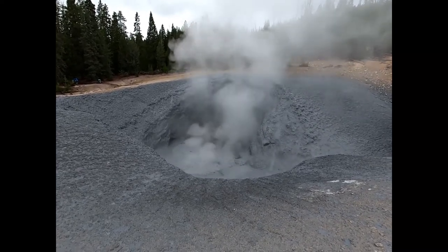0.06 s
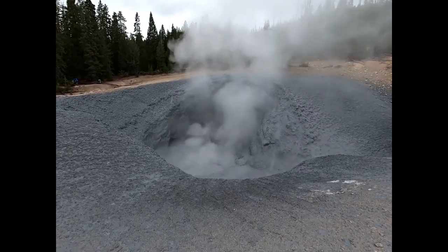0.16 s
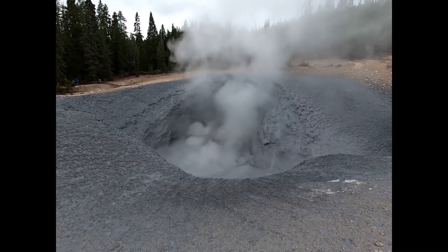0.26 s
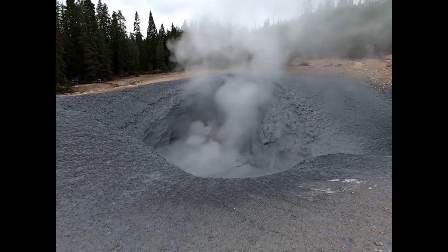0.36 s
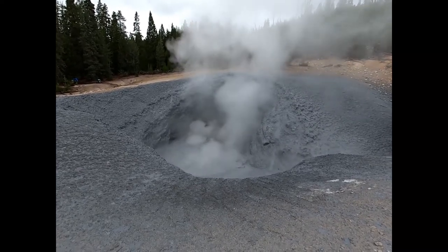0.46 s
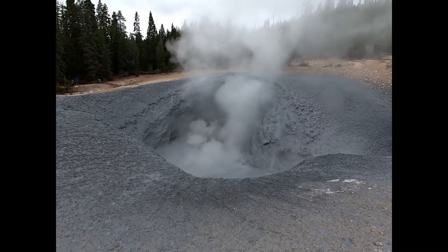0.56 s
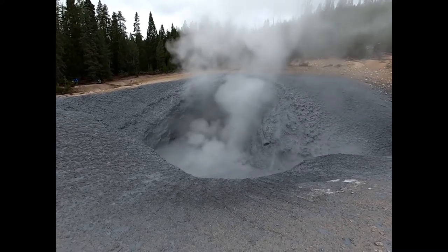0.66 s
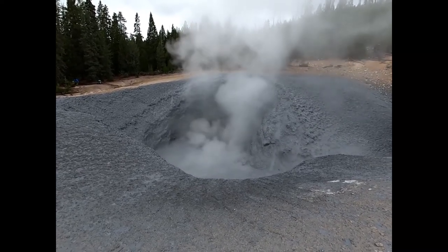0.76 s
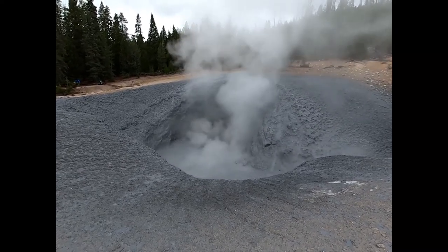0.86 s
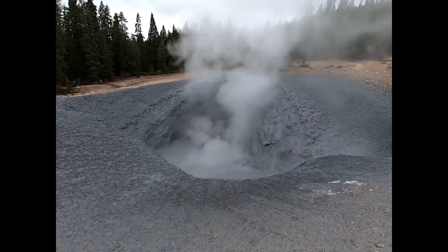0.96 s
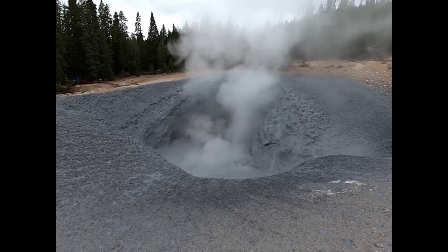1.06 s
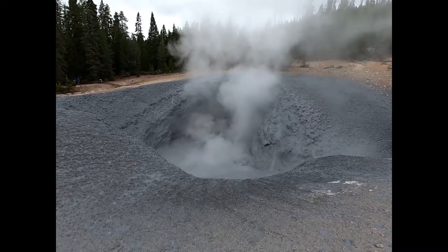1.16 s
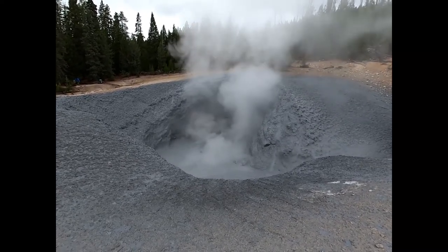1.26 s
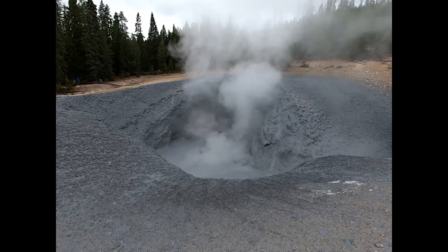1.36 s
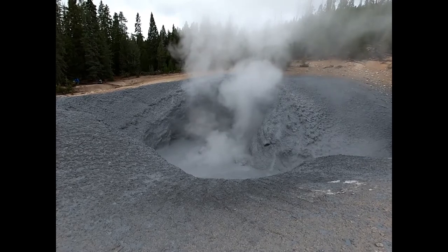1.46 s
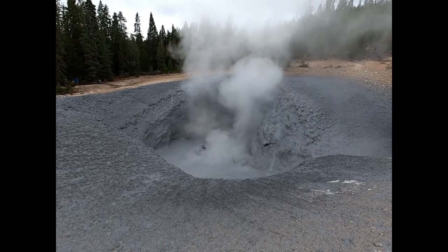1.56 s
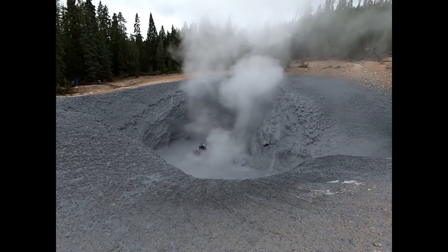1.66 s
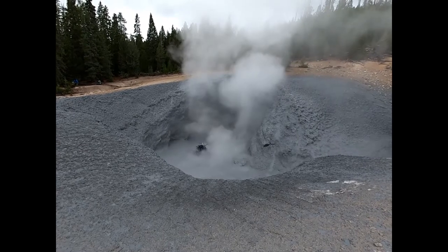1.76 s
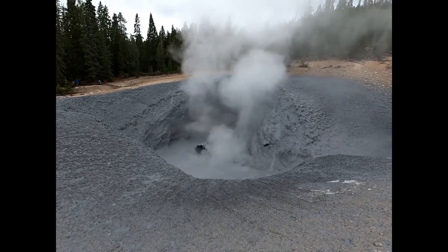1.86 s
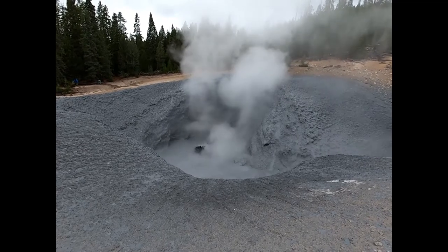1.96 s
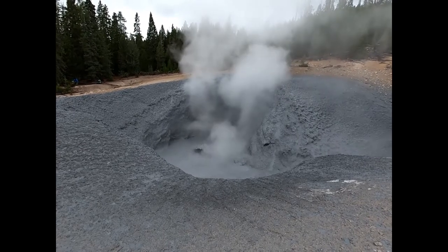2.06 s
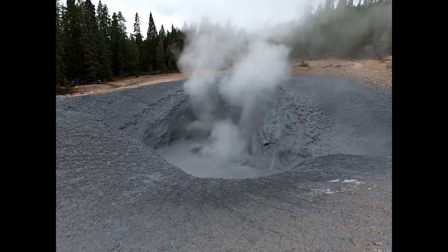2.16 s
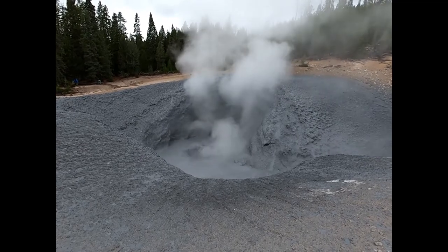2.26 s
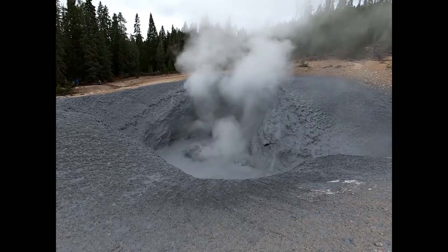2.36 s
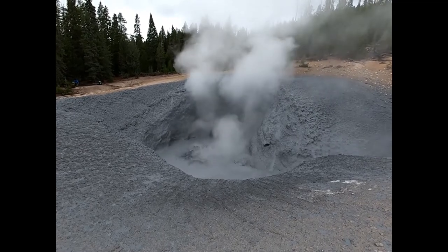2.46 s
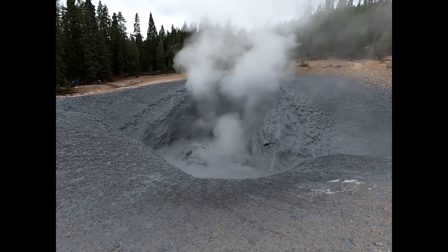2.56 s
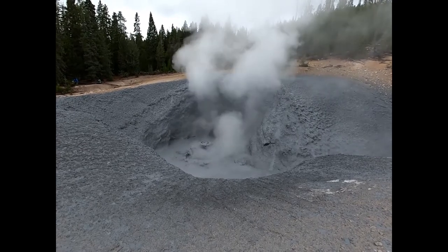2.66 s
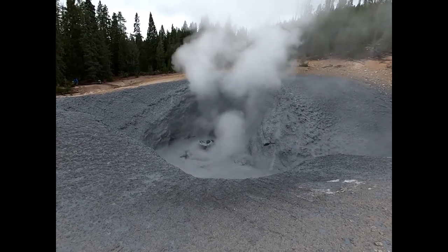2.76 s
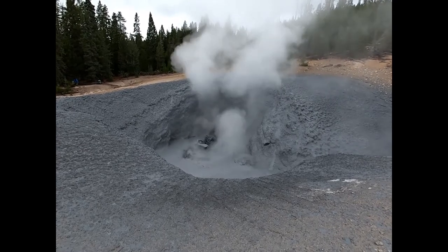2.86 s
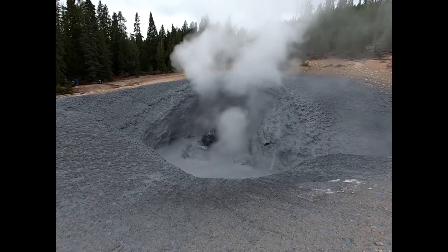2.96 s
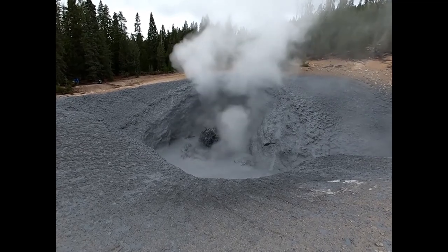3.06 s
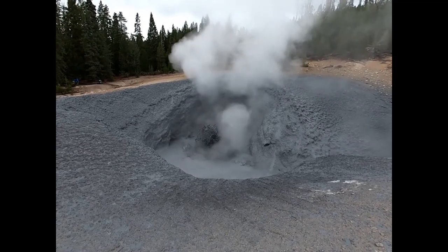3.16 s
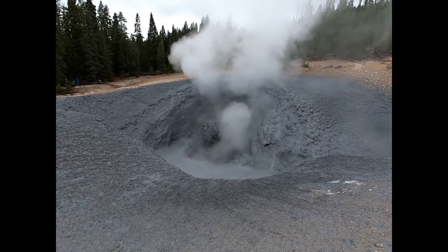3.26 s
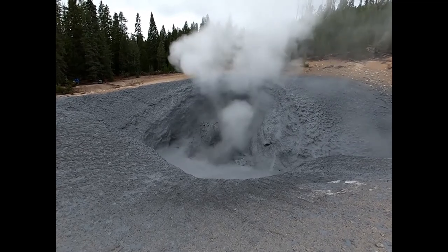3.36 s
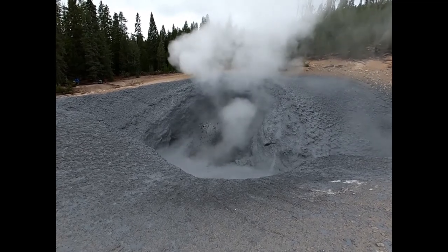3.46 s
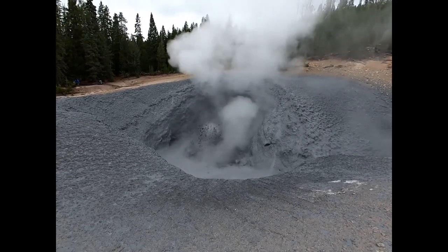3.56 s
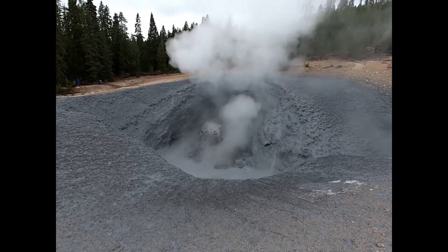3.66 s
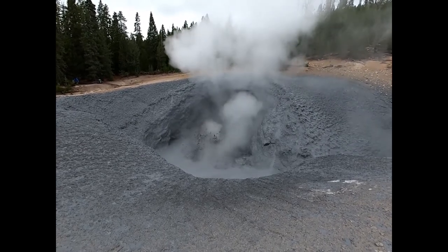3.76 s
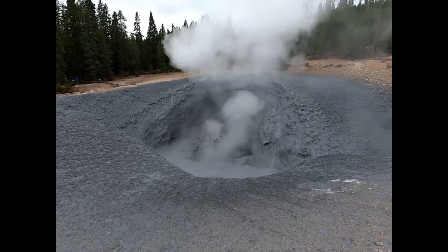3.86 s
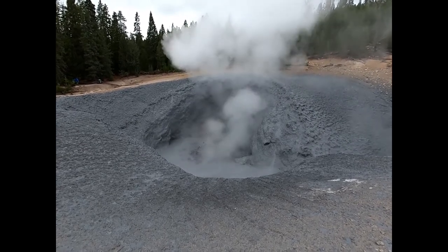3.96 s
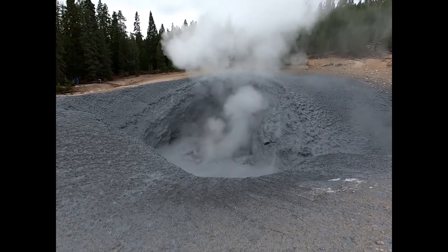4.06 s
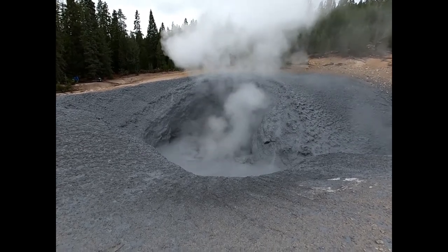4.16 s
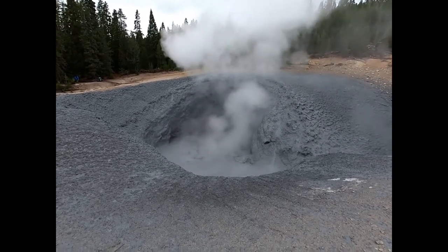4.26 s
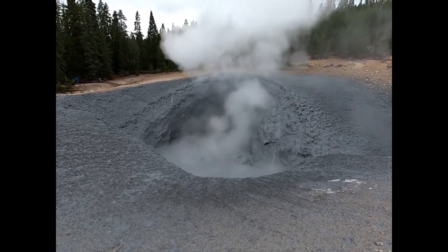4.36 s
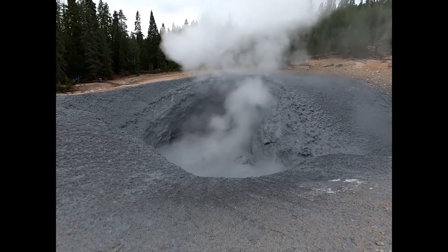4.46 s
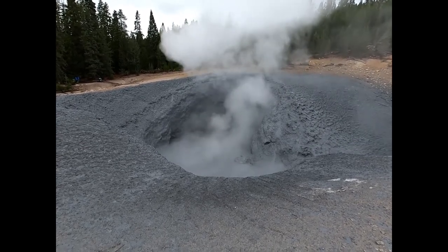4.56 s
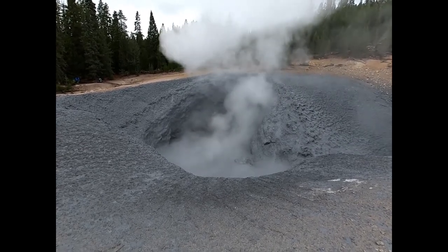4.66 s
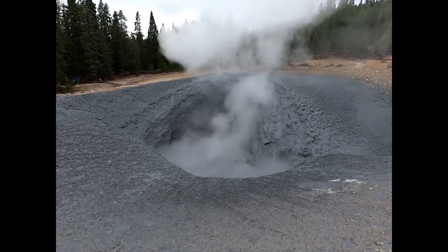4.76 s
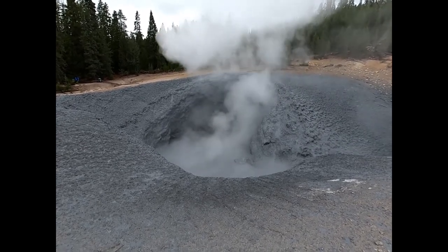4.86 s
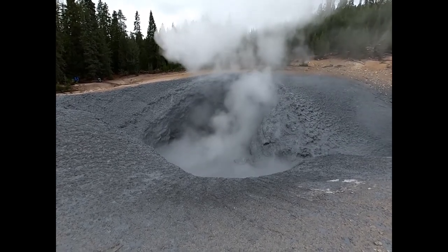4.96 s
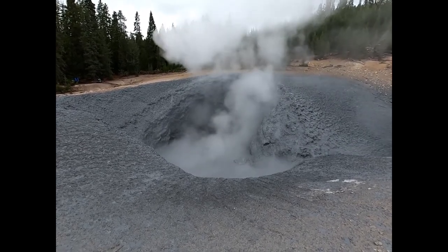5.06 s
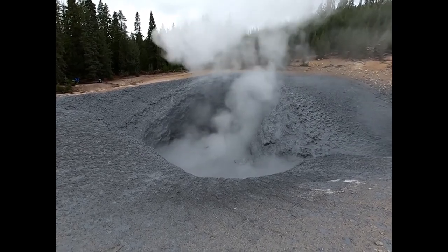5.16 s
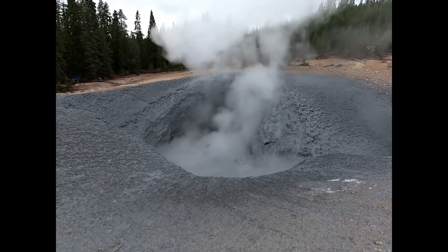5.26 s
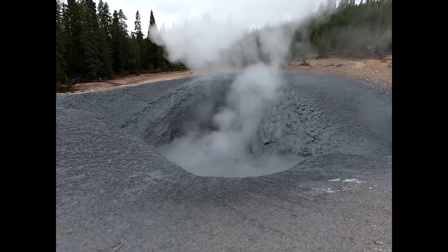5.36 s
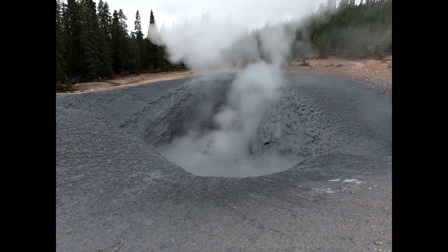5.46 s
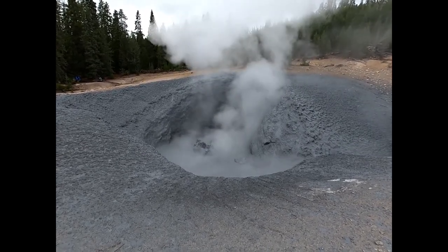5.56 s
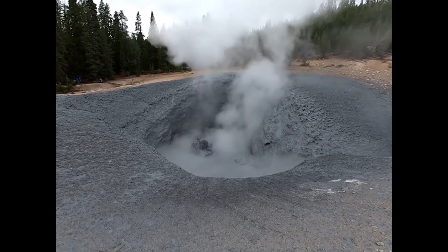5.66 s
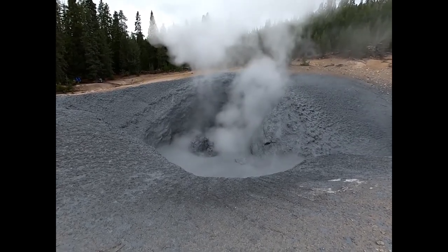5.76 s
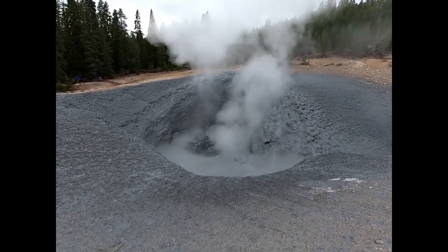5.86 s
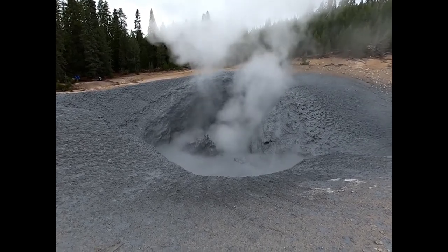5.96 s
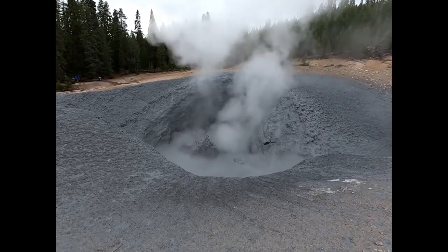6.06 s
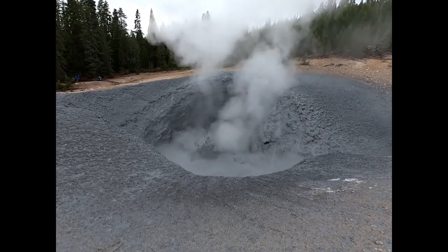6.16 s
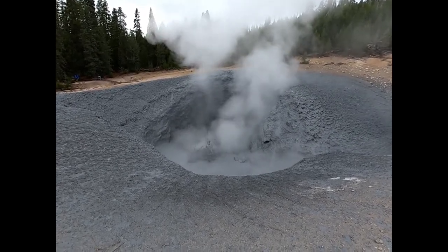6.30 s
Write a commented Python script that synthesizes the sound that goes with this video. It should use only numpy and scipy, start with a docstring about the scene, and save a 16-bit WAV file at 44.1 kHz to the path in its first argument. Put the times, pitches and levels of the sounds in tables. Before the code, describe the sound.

A boiling mud pool outdoors, heard close from the crater rim, nearly centred with slight stereo spread and little echo. It opens in a fading surge: puffing steam, fine sputtering spray and low churning. By 0.6-0.95 s the hiss collapses and a cluster of wet mud splats slaps down. Until 1.7 s it is quiet, with small bubbles, soft plops and low thumps. Then steam and spray build, with hard splats near 2.2 s and a heavy gulp; the hiss dips briefly at 2.4 s and swells again. From 2.8 to 4.2 s it roars, brightest and loudest around 3.8 s, over ragged glugging and deep heaves. At about 4.3 s it drops sharply into a sparse lull of ticking splats and tiny bubbles, with one strong plop at 5.2 s. From 5.7 s deep bubbles and steam surge again, growing until the end at 6.3 s.

```python
"""A boiling mud pool in a crater, heard from the rim through two close microphone ports.
A surge of steam and spray (filtered noise and clicks) is under way and sinks before 1 s; thrown mud
(short resonant noise bursts) splats down in the lull. From 1.7 s the vent builds again, with a brief dip
near 2.4 s, while bubbles gulp (gliding cycles) and the pool heaves (deep noise). It drops at 4.3 s into
a second lull of splats and small bubbles, then surges from 5.7 s to the end."""
import sys
import numpy as np
from scipy import signal
from scipy.fft import rfft, irfft
from scipy.io import wavfile

SR = 44100
rng = np.random.default_rng(int(sys.argv[2]) if len(sys.argv) > 2 else 0)


def generate_wav(signal):
    """Clip the signal to [-1, 1] and save it as 16-bit WAV at the path in sys.argv[1]."""
    frames = np.transpose(np.atleast_2d(signal))
    scaled = np.clip(frames, -1, 1) * 32767
    pcm = np.round(scaled).astype(np.int16)
    wavfile.write(sys.argv[1], SR, pcm)


N = 279153   # length in samples

# Deep heaving of the whole pool. Each row: frequency in Hz, relative level in dB per Hz.
HEAVE_SPECTRUM = [(4, 3.5), (12, 15), (26, 8.5), (45, 10), (65, 0.5), (100, -37.5), (800, -120)]
# Tops of the heaves. Each row: time in seconds, level in dB.
HEAVE_TOPS = [(.1, -45), (.9, -55), (1.27, -36), (1.45, -33), (1.58, -35), (1.85, -41), (2.13, -45),
              (2.27, -37), (2.48, -31.5), (2.59, -36), (2.82, -26.5), (2.93, -34), (3.35, -43),
              (3.49, -27.5), (3.83, -38), (4.08, -46), (4.68, -46), (5.2, -41), (5.5, -35), (5.59, -30.5),
              (5.8, -42), (6.26, -39.5)]
HEAVE_REST_DB, HEAVE_RISE_DB_PER_S, HEAVE_FALL_DB_PER_S = -51, 145, 147

# Mud washing about. Each row: frequency in Hz, relative level in dB per Hz.
SLOSH_SPECTRUM = [(100, -67), (200, -23.5), (300, 0), (500, 3), (700, -0.5), (1000, -5.5), (1300, -17),
                  (4000, -110)]
# The boil of many bubbles. Each row: frequency in Hz, relative level in dB per Hz.
CHURN_SPECTRUM = [(25, -30), (55, -4.5), (80, -3), (150, 1), (220, 0.5), (330, -3.5), (500, -23),
                  (3000, -110)]
# Course of the mud, before puffs and spurts. Each row: time in seconds, slosh in dB, churn in dB.
MUD_COURSE = [(0, -37, -35), (.25, -39.5, -44), (.4, -40.5, -40.5), (.55, -41, -43), (.9, -60.5, -51),
              (1.23, -59, -48.5), (1.72, -51.5, -40.5), (1.92, -36.5, -34.5), (2.05, -41, -34),
              (2.27, -36, -29), (2.5, -42.5, -34.5), (2.85, -31.5, -30.5), (3.1, -33.5, -33),
              (3.4, -38, -33.5), (3.6, -33.5, -33), (3.8, -32.5, -34), (4.16, -31, -33), (4.39, -54, -53),
              (4.72, -59.5, -46.5), (4.88, -66, -51), (5.06, -59, -47), (5.2, -54.5, -34),
              (5.27, -47.5, -41), (5.32, -57.5, -49.5), (5.55, -57, -45), (5.8, -36, -29.5),
              (6.1, -30.5, -31.5), (6.33, -33, -28)]
DEEP_HZ = 120   # below this the churn deepens with a harder boil

# Thrown mud landing, before the way to the microphone.
# Each row: start in seconds, level in dB, tick share in dB, tick pitch in Hz.
MUD_SPLATS = [(0.278, -37, -11, 3300), (0.5893, -21.5, 0, 3440), (0.618, -28.5, -23, 3300),
              (0.666, -27, -5, 2700), (0.6868, -19.5, -18, 4000), (0.7373, -33, -24, 3300),
              (.741, -43, 0, 7000), (0.757, -35, -16, 2200), (0.78, -34, -3, 3170), (.819, -35, -16, 3300),
              (0.8583, -32, -5, 3300), (0.871, -34.5, -10, 6000), (0.885, -35, -5, 4500),
              (.929, -47, 0, 5500), (0.9398, -26, -9.5, 4200), (.954, -41, 0, 4800),
              (0.969, -39, -13, 3500), (1.044, -49, 0, 5000), (1.0858, -35.5, -4.5, 4940),
              (1.339, -34, -17, 3300), (1.362, -51, 0, 6500), (1.425, -44, 0, 5170),
              (1.436, -35.5, -18, 3300), (1.626, -32, -10.5, 3300), (1.644, -43, 0, 5350),
              (1.698, -41, -2, 5500), (1.761, -27, -11, 3300), (1.843, -25, 4, 3320),
              (1.9018, -28, -20, 3300), (2.063, -23, -28, 3300), (2.123, -29, 1, 3300),
              (2.2157, -16.5, -10, 3680), (2.236, -16, -4, 3260), (2.3343, -22.5, -0.5, 3000),
              (2.495, -25.5, 2, 3560), (2.542, -26, -21, 3300), (3.069, -27, -20, 3300),
              (3.269, -17.5, -23, 3300), (3.313, -18.5, -24, 3300), (4.229, -20, 0, 4140),
              (4.319, -25, -30, 3300), (4.341, -32, -29, 3300), (4.3547, -24.5, 0, 3700),
              (4.383, -31, 0, 4430), (4.432, -34, 3, 2100), (4.4772, -43, -1, 2200), (4.486, -43, 0, 4600),
              (4.591, -35, -4, 5000), (4.683, -36, -17, 3300), (4.697, -33.5, 1, 2070),
              (4.705, -30.5, -2, 4100), (4.7321, -42, 0, 3400), (4.773, -48, 0, 6500),
              (4.8452, -36, 3, 4800), (4.91, -39, 0, 4200), (4.918, -40, 0, 5000), (4.929, -40, 2, 5270),
              (4.957, -48, 0, 5400), (5.105, -40, -4, 6000), (5.147, -30.5, -4, 3500),
              (5.19, -36, -10, 2200), (5.248, -32, -24, 3300), (5.2742, -29, -12, 2590),
              (5.3487, -48, -8, 4000), (5.414, -43, 0, 4300), (5.443, -51, 0, 6500),
              (5.463, -35.5, -19, 3300), (5.4994, -28, -7, 3900), (5.526, -30, -7.5, 2590),
              (5.585, -42, -18, 2500), (5.6266, -46, -9, 2300), (5.7064, -36, -2, 3500),
              (5.8, -36, -1, 4500), (5.817, -39, 0, 7760), (5.836, -36, -7, 7960), (5.845, -31, 0, 5200)]
# The way from the splats to the microphone. Each row: frequency in Hz, gain in dB.
DISTANCE_GAIN = [(500, 8.5), (5000, -6), (7500, -3.5), (9000, -14), (11500, -34), (14500, -59)]
# Hump of the microphone housing: its frequency in Hz, its width in Hz.
HOUSING_HUMP = (1445, 560)
TICK_WIDTH, TICK_LENGTH = 0.44, 0.99   # share of its pitch; share of the slap's length
CONTACT = 4.6   # first touch, against the noise that follows
SNAP_DB, SNAP_S = -8.5, 0.00077   # the wide snap of first contact: level before its share, decay time

# Big bubbles breaking the surface, and, in the very low rows near 5.6 s, deep heaves of the whole pool; all
# before their ragged flutter. Each row: middle in seconds, level in dB, # pitch at the middle in Hz, length in
# cycles of that pitch, glide in octaves per length.
GULP_ROWS = [(0.068, -28, 92, 1.8, -3), (0.215, -25, 130, 3, 1.1), (0.229, -33, 220, 5.4, 1.5),
             (0.276, -28, 100, 1.3, 1), (0.296, -29.5, 165, 2.6, 0), (0.4, -26, 99, 1.7, 2),
             (0.542, -25.5, 270, 5.5, 0.6), (0.821, -35.5, 320, 1.9, -1), (1.103, -34, 280, 1.6, 1.5),
             (1.116, -36, 255, 2.9, 0), (1.319, -39.5, 110, 7, 3), (1.279, -43, 510, 3, -0.5),
             (1.3425, -26, 350, 1.2, -0.5), (1.356, -33.5, 400, 3.4, -0.8), (1.387, -39.5, 140, 4.5, 0.5),
             (1.412, -41, 225, 4, .4), (1.435, -34, 18, 0.99, 3.5), (1.447, -36, 160, 3.2, 0.75),
             (1.486, -39.5, 470, 8.1, -0.2), (1.489, -29, 95, 6.1, 2.5), (1.508, -28.5, 197, 6, 0.6),
             (1.566, -44, 200, 7, .2), (1.628, -32.5, 136, 4.9, 1.3), (1.77, -40, 155, 5.5, 1),
             (1.676, -31.5, 120, 2.6, 3), (1.859, -22.5, 160, 5.8, 1), (1.891, -17.5, 176, 2.1, 0),
             (2.059, -21.5, 94, 2.9, 0.9), (2.082, -21, 340, 4.1, -0.8), (2.187, -17.5, 93, 1.7, -1.5),
             (2.22, -10.5, 207, 1.45, -1.1), (2.242, -16, 175, 4, -0.1), (2.279, -18.5, 157, 3.6, 1.8),
             (2.297, -19, 54, 1.23, 4), (2.35, -28, 65, 1.9, -1), (2.608, -25, 73, 2.7, 0),
             (2.677, -20.5, 200, 1.9, -2.5), (2.731, -18.5, 200, 2.4, 1), (2.796, -21.5, 147, 3.1, -0.5),
             (2.809, -16.5, 42, 0.98, 3.8), (2.8426, -15, 120, 1.4, 3), (2.883, -19, 100, 1.2, -1.5),
             (2.912, -18.5, 120, 3.2, 2.2), (2.938, -18, 130, 2.6, 1), (2.985, -18, 66, 0.96, -1.5),
             (2.966, -15, 124, 4.5, 1.9), (3.022, -25, 125, 3.5, 3), (3.093, -21.5, 240, 6.3, 0.5),
             (3.303, -19, 136, 4, 1.5), (3.433, -22.5, 206, 6.6, 0.44), (3.483, -19, 103, 2.1, 0.7),
             (3.508, -19, 150, 1.8, 0.076), (3.589, -14.5, 97, 1.24, 1.2), (3.609, -25, 100, 2.4, -1),
             (3.632, -17, 120, 1.1, 1), (4.008, -22.5, 85, 1.8, 1.2), (4.133, -24.5, 94, 2.1, 1),
             (4.173, -26.5, 170, 2.2, 0.9), (4.389, -38.5, 224, 3.8, 1), (4.638, -37.5, 480, 7.5, -0.5),
             (4.658, -43, 460, 7.7, -0.5), (4.695, -36, 280, 5.1, 1.5), (4.719, -41, 330, 2.5, 1),
             (4.768, -47, 750, 14, 0.4), (4.972, -42, 310, 5.5, 1.5), (5.002, -43, 1400, 29, 0),
             (5.117, -39, 260, 10, -0.3), (5.15, -35, 220, 4.5, 2), (5.194, -14.5, 320, 1.25, -1.3),
             (5.203, -25, 340, 6.2, 0.18), (5.217, -22, 290, 3.8, 0.5), (5.257, -31, 175, 2.4, -1),
             (5.482, -28.5, 49, 1.5, 2), (5.553, -34.5, 9.2, 1.4, 4), (5.618, -31, 21, 1.6, 3.3),
             (5.62, -34.5, 182, 8.6, -0.2), (5.675, -28.5, 155, 4.9, 2.1), (5.73, -38, 157, 10, .1),
             (5.782, -16.5, 147, 2, 0.11), (5.825, -18, 150, 2.4, -0.5), (5.858, -16.5, 150, 2.9, -0.7),
             (5.921, -21, 135, 3.6, -1.5), (6.04, -15.5, 170, 1.2, 0.37), (6.258, -18, 233, 3.1, -0.8),
             (6.322, -18.5, 195, 7.1, 0.3)]
RAGGED_DB, RAGGED_HZ = 1.36, 130   # spread and rate of the flutter of a bubble's strength
PUSH_TURN, PUSH_SPREAD = 0.48, 0.054   # pushes, then draws back: phase at the middle, in turns

# Fine droplets. Each row: frequency in Hz, relative level in dB per Hz.
SPRAY_SPECTRUM = [(1000, -55.5), (2000, -5.5), (2800, -4), (3550, 0), (5300, -7.5), (6200, -14),
                  (7600, -18), (8800, -30), (10000, -37), (11500, -43), (13000, -55), (14500, -60)]
AIR_HZ = 8550   # above this the hiss is slightly stronger when the spray is louder
# Steam, with the hump of the microphone housing. Each row: frequency in Hz, relative level in dB per Hz.
RUSH_SPECTRUM = [(500, -37.5), (900, -18), (1080, -12), (1200, -4.5), (1550, -3.5), (1800, -9),
                 (2200, -14.5), (3000, -26), (8000, -77)]
# Course of the vent, before puffs and spurts. Each row: time in seconds, steam rush in dB, spray in dB.
VENT_COURSE = [(0, -32.5, -42.5), (.67, -41.5, -48.5), (.72, -44.5, -52.5), (.9, -57, -64),
               (1.25, -57, -66), (1.325, -57, -72), (1.345, -49.5, -64), (1.6, -55, -67),
               (1.63, -48.5, -63.5), (1.74, -46, -57), (1.85, -39, -48), (2.3, -35.5, -46),
               (2.375, -37.5, -45.5), (2.41, -43.5, -56.5), (2.465, -39, -50), (2.55, -39.5, -47.5),
               (2.78, -31, -42.5), (3.0, -31, -44.5), (3.15, -32.5, -42.5), (3.39, -31.5, -39.5),
               (3.77, -27.5, -34.5), (4.21, -31.5, -37.5), (4.255, -32, -45.5), (4.285, -42, -47.5),
               (4.48, -51, -57.5), (4.78, -52.5, -60.5), (4.88, -60, -66.5), (5.02, -56, -63),
               (5.3, -50.5, -63), (5.57, -56.5, -70), (5.685, -43, -59), (5.715, -38, -53.5),
               (5.82, -38, -48), (5.88, -30, -40.5), (6.33, -27.5, -36.5)]
# Short spurts of steam over the surge. Each row: top in seconds, gain in dB.
STEAM_SPURTS = [(.943, 7), (1.15, 7), (1.782, 2), (1.838, 2.5), (1.905, 7.5), (1.985, 2), (2.064, 3.5),
                (2.216, 6.5), (2.328, 3), (2.49, 2.5), (3.309, 4.5), (4.69, 2), (5.066, 7), (5.149, 12),
                (5.5, 6.5), (5.955, 3)]
SPURT_RISE_S, SPURT_FALL_S = 0.017, 0.079

# Balance of the two ports. Each row: frequency in Hz, left minus right in dB.
PORT_LEAN = [(60, -1.47), (1500, -0.4), (2800, -2.5), (4850, -4), (7000, 0), (12000, -1)]
# Sound that differs between the ports. Each row: frequency in Hz, level against the shared sound in dB.
PORT_SCATTER = [(60, -29.5), (500, -26.5), (1500, -20.5), (3000, -18), (5000, -13), (8400, -5.5),
                (12000, -4)]
CUTOFF_HZ = 14800


def from_db(db):
    """Decibels to gain."""
    return 10 ** (np.asarray(db) / 20)


def rms_one(x):
    """Scaled to rms 1."""
    return x / np.sqrt(np.mean(x ** 2) + 1e-20)


def response(spectrum):
    """Causal (minimum-phase) impulse response that follows (Hz, dB) points."""
    size = 16384
    hz, db = np.transpose(spectrum)
    grid = np.maximum(np.fft.rfftfreq(size, 1 / SR), 1)
    log_gain = np.interp(np.log(grid), np.log(hz), db) * np.log(10) / 20
    # folding the cepstrum onto positive times makes the response causal
    cepstrum = irfft(log_gain)
    cepstrum[1:size // 2] *= 2
    cepstrum[size // 2 + 1:] = 0
    return irfft(np.exp(rfft(cepstrum)))


def colour(x, spectrum):
    """Filtered to a spectrum."""
    return signal.fftconvolve(x, response(spectrum))[:N]


def split(x, hz):
    """The parts below and above a frequency; each filter runs twice so that they add up without a notch."""
    parts = []
    for kind in ("low", "high"):
        sos = signal.butter(2, hz, kind, fs=SR, output="sos")
        parts.append(signal.sosfilt(np.vstack([sos, sos]), x))
    return parts


def resonate(x, hz, width_hz):
    """Twice through a two-pole resonance; peak 1."""
    r = np.exp(-np.pi * width_hz / SR)
    poles = [1, -2 * r * np.cos(2 * np.pi * hz / SR), r * r]
    for _ in range(2):
        x = signal.lfilter([1, 0, -1], poles, x)
    return x / np.abs(x).max()


def drift(rate_hz):
    """Slow chance: noise at every 20th sample through a double one-pole low-pass; spread 1."""
    r = np.exp(-40 * np.pi * rate_hz / SR)
    noise = rng.standard_normal(N // 20 + 2002)
    slow = signal.lfilter([1], [1, -2 * r, r * r], noise)[2000:]   # past the filter's start
    return np.interp(np.arange(N) / 20, np.arange(len(slow)), rms_one(slow))


def grains(per_s, spread_db):
    """Random clicks of uneven size and either sign; rms 1."""
    size_db = spread_db * np.minimum(rng.exponential(1, N), 4)
    sizes = from_db(size_db) * rng.choice([-1, 1], N)
    return rms_one(sizes * (rng.random(N) < per_s / SR))


def add(out, at, piece):
    """Adds a short sound at a sample position."""
    piece = piece[max(-at, 0):N - at]
    start = max(at, 0)
    out[start:start + len(piece)] += piece


def in_time(rows):
    """Curve columns, sample by sample."""
    s, *columns = np.transpose(rows)
    return [np.interp(np.arange(N) / SR, s, column) for column in columns]


def heave():
    """The whole pool: deep noise that swells to each heave and sinks back to rest."""
    t = np.arange(0, N, 100) / SR
    swells = []
    for s, db in HEAVE_TOPS:
        slope = np.where(t < s, HEAVE_RISE_DB_PER_S, HEAVE_FALL_DB_PER_S)
        swells.append(db - slope * np.abs(t - s))
    strongest_db = np.maximum(np.max(swells, axis=0), HEAVE_REST_DB)
    level_db = np.interp(np.arange(N) / SR, t, strongest_db)
    return from_db(level_db) * rms_one(colour(rng.standard_normal(N), HEAVE_SPECTRUM))


def slosh(level_db, puffs):
    """Mud washing about: lumpy noise in the low middle."""
    lumpy = rng.standard_normal(N) + from_db(-23.0) * grains(400, 3.7)
    wash = rms_one(colour(lumpy, SLOSH_SPECTRUM))
    return from_db(level_db + 1.04 * puffs + 2.0 * drift(20)) * wash


def gulp(hz, ms, rise, turn):
    """A few peaky cycles swell fast and die slower; a positive rise lifts the pitch as the cavity closes."""
    length = ms * SR / 1000
    half = round(1.5 * ms * SR / 1000)
    u = np.arange(-half, half) / length   # time from the middle, in lengths
    phase = 2 * np.pi * np.cumsum(hz * 2 ** (rise * np.clip(u, -.8, .8))) / SR
    phase += turn - phase[len(u) // 2]
    steepness = np.where(u < 0, 1.5, .9)
    swell = np.exp(-np.log(16) * (u * steepness) ** 2) * np.hanning(len(u))
    overtone = 0.27 / (1 + (hz / 300) ** 2)   # big slow bubbles are peakier than small ones
    return swell * (np.sin(phase) + overtone * np.sin(2 * phase))


def churn(level_db, puffs, count=600):
    """Random bubbles of one or two cycles' length over a muddy roar; a harder boil reaches deeper."""
    out = np.zeros(N)
    for when, pitch, length, rise, size, turn in rng.random((count, 6)):
        hz = 65 * 2 ** (2.4 * pitch)
        ms = (0.869 + 0.927 * length) * 1000 / hz
        bubble = gulp(hz, ms, 0.96 * rise, 2 * np.pi * turn)
        add(out, int(when * N), from_db(9.1 * size) * bubble)
    roar = rms_one(colour(rng.standard_normal(N), CHURN_SPECTRUM))
    bubbles = rms_one(colour(out, CHURN_SPECTRUM))
    deep, shallow = split(rms_one(bubbles + from_db(2.5) * roar), DEEP_HZ)
    boil = shallow + deep * from_db(0.57 * (level_db + 37.5))
    return from_db(level_db + 1.4 * puffs) * boil


def splat(t60_ms, tick_db, tick_hz, noise):
    """A dying noise burst: a wide snap, a dull slap in the housing hump and a tick at its own pitch."""
    t = np.arange(len(noise)) / SR
    start = noise * np.minimum(t / .0004, 1)
    start[1] = CONTACT * np.sign(noise[1])
    dying_db = -60000 * t / t60_ms
    share = min(from_db(tick_db), .95)
    slap = resonate(start * from_db(dying_db), *HOUSING_HUMP)
    snap = from_db(SNAP_DB) * noise * np.exp(-t / SNAP_S)
    tick = resonate(start * from_db(dying_db / TICK_LENGTH), tick_hz, TICK_WIDTH * tick_hz)
    return (1 - share) * slap + share * (snap + tick)


def splats(level_db, count=1100):
    """Mud landing: the big lumps one by one, and a patter of small drops of every pitch."""
    out = np.zeros(N)
    noises = rng.standard_normal((len(MUD_SPLATS), 1200))
    for (s, peak_db, tick_db, tick_hz), noise in zip(MUD_SPLATS, noises):
        add(out, round(s * SR), from_db(peak_db) * splat(17.0, tick_db, tick_hz, noise))
    chances = rng.random((count, 4))
    noises = rng.standard_normal((count, 500))
    for (when, size, pitch, share), noise in zip(chances, noises):
        at = int(when * N)
        drop = splat(6.8, -14 * share, 1800 * 2 ** (1.6 * pitch), noise)
        drop_db = 0.67 * level_db[at] - 10.5 + 13.3 * size ** 2   # drops keep falling in the lulls
        add(out, at, from_db(drop_db) * drop)
    return colour(out, DISTANCE_GAIN)


def gulps():
    """The big bubbles, with a few deep heaves of the pool, one by one; thick mud makes them ragged."""
    out = np.zeros(N)
    turns = 2 * np.pi * rng.normal(PUSH_TURN, PUSH_SPREAD, len(GULP_ROWS))
    for (s, peak_db, hz, cycles, rise), turn in zip(GULP_ROWS, turns):
        piece = gulp(hz, 1000 * cycles / hz, rise, turn)
        add(out, round(s * SR) - len(piece) // 2, from_db(peak_db) * piece)
    return out * from_db(RAGGED_DB * drift(RAGGED_HZ))


def spurts():
    """Decibels gained in the spurts: a quick swell and a slower sag."""
    t = np.arange(N) / SR
    return sum(np.interp(t, [s - SPURT_RISE_S, s, s + SPURT_FALL_S], [0, db, 0]) for s, db in STEAM_SPURTS)


def spray(level_db, puffs):
    """Fine droplets hissing and sputtering: noise and clicks, the top slightly stronger when louder."""
    droplets = rng.standard_normal(N) + from_db(-5.0) * grains(1000, 5.6)
    low, air = split(rms_one(colour(droplets, SPRAY_SPECTRUM)), AIR_HZ)
    hiss = low + air * from_db(0.054 * (level_db + 21.0) + 1.0 * drift(22))
    sputter_db = 0.97 * drift(23) + 0.57 * drift(150)
    return from_db(level_db + 0.23 * puffs + sputter_db) * hiss


def rush(level_db, puffs):
    """Steam tearing out of the vent: noise and coarse droplets, puffing."""
    coarse = rng.standard_normal(N) + from_db(-5.5) * grains(1200, 3.9)
    steam = rms_one(colour(coarse, RUSH_SPECTRUM))
    return from_db(level_db + 0.44 * puffs + 1.1 * drift(31)) * steam


def ports(x):
    """Both ports hear nearly the same; the right leans louder and scatter off the crater wall differs."""
    t = np.arange(round(.2 * SR)) / SR
    scatter = rng.standard_normal(len(t)) * from_db(-60 * t / .16)   # falls 60 dB in 0.16 s
    scattered = signal.fftconvolve(x, scatter / np.linalg.norm(scatter))[:N]
    side = colour(scattered, PORT_SCATTER)
    left = colour(x + side, [(hz, db / 2) for hz, db in PORT_LEAN])
    right = colour(x - side, [(hz, -db / 2) for hz, db in PORT_LEAN])
    return np.array([left, right])


def scene():
    """All of the pool at the two ports."""
    rush_db, spray_db = in_time(VENT_COURSE) + spurts()
    slosh_db, churn_db = in_time(MUD_COURSE)
    puffs = drift(21.0)   # the vent puffs, and slosh, churn, rush and spray follow together
    mud = heave() + slosh(slosh_db + 0.93 * spurts(), puffs) + churn(churn_db, puffs) + gulps()
    vent = rush(rush_db, puffs) + spray(spray_db, puffs)
    return ports(mud + vent + splats(spray_db))


def record(dry):
    """The top is cut: a steep low-pass, 70 dB down from the cutoff up."""
    return signal.sosfilt(signal.cheby2(12, 70, CUTOFF_HZ, fs=SR, output="sos"), dry)


dry = scene()
out = record(dry)
generate_wav(out)
```